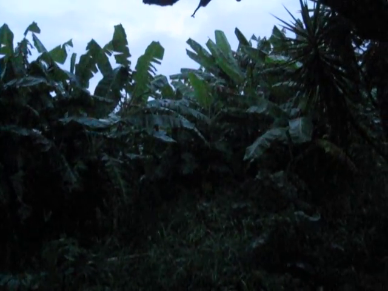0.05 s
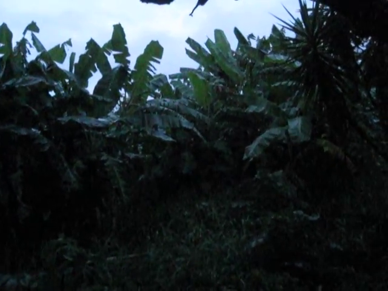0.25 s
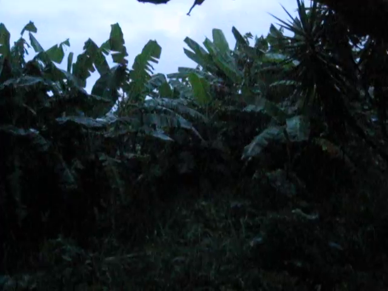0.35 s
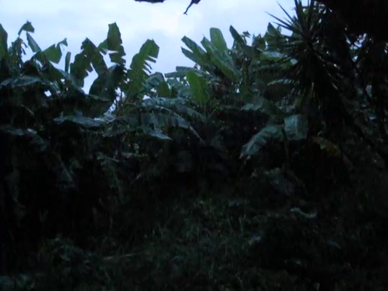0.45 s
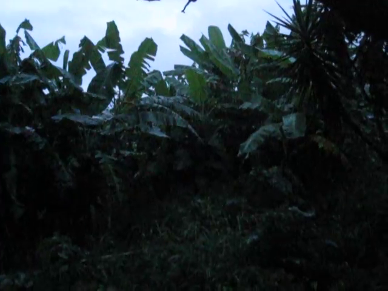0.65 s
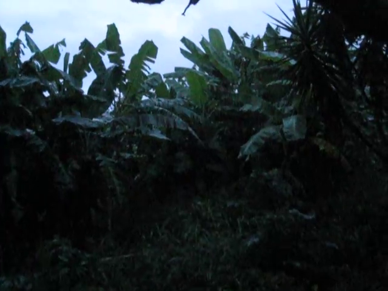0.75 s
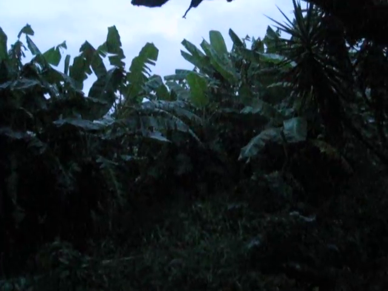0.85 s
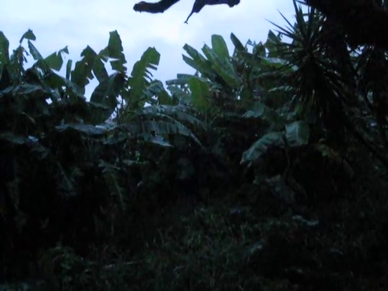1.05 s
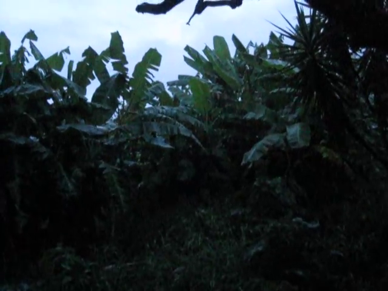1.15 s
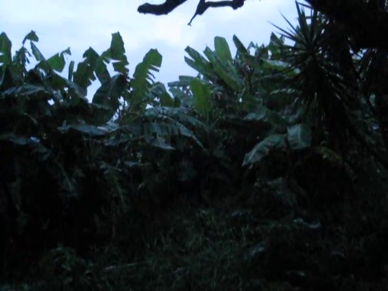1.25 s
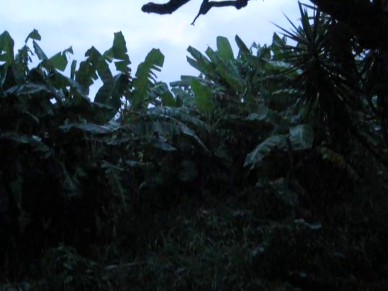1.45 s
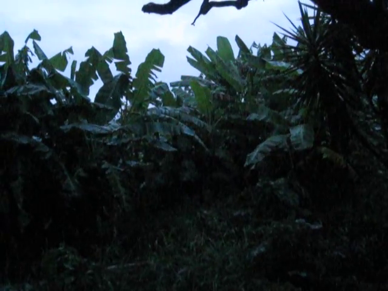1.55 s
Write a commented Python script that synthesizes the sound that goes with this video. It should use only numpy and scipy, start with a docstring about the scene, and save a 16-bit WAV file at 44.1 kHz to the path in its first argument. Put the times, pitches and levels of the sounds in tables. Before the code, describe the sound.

A frog calls once in a banana grove. From about 0.2 to 0.6 seconds, two overlapping whines glide down roughly an octave, with two short buzzy chucks near 0.5 and 0.6 seconds and a slight echo. Distant insects shrill quietly throughout over a faint rumble. Nearer insects buzz at the start and from 0.9 to 1.5 seconds. One light tick, like a drip on a leaf, lands around 1.1 seconds.

```python
"""Frog call at dusk

In a banana grove, two overlapping frog whines glide down about an octave. Then come two buzzy chucks,
made by pulses ringing the throat, and the call echoes off the plants. A far insect chorus shrills
throughout, and two nearer insects buzz their wings in spells. Something ticks once, like a drip on
a leaf, over a faint rumble."""
import sys
import numpy as np
from scipy import signal
from scipy.fft import rfft, irfft
from scipy.io import wavfile

SR = 44100
rng = np.random.default_rng(int(sys.argv[2]) if len(sys.argv) > 2 else 0)


def digitize_waveform(pressure):
    """Quantize a signal to 16-bit integers and store it at the path in sys.argv[1].

    Rows of a 2-D input are taken as channels; values are limited to [-1, 1].
    """
    field = np.atleast_2d(pressure).T
    bounded = np.clip(field, -1, 1)
    quanta = np.round(bounded * 32767).astype(np.int16)
    wavfile.write(sys.argv[1], SR, quanta)


N = 70560
T = np.arange(N) / SR


def from_db(db):
    """Turn decibels into a number to multiply by."""
    return 10 ** (np.asarray(db) / 20)


def unit_level(x):
    """Scale a sound so its average strength (rms) is 1."""
    return x / np.sqrt(np.mean(x ** 2) + 1e-20)


def over_time(rows):
    """Join a table's points in time with straight lines, one curve per column."""
    time_s, *columns = np.transpose(rows)
    return [np.interp(T, time_s, column) for column in columns]


def db_at_pitch(points, hz):
    """Read a level between a table's pitches, with octaves evenly spaced."""
    pitch_hz, level_db = np.transpose(points)
    return np.interp(np.log(np.maximum(hz, 1)), np.log(pitch_hz), level_db)


def drift(rate_hz):
    """A random wobble of size 1, mostly slower than rate_hz."""
    hz = np.fft.rfftfreq(N, 1 / SR)
    return unit_level(irfft(rfft(rng.standard_normal(N)) / (1 + (hz / rate_hz) ** 2), N))


def noise(colour):
    """Steady noise of strength 1, with lows and highs balanced by a table."""
    gain = from_db(db_at_pitch(colour, np.fft.rfftfreq(N, 1 / SR)))
    return unit_level(irfft(rfft(rng.standard_normal(N)) * gain, N))


def pulses(hz):
    """One click per cycle, shared between two neighbouring samples."""
    cycles = np.cumsum(hz) / SR
    i = np.flatnonzero(np.diff(np.floor(cycles)) > 0)
    early_share = (cycles[i + 1] % 1) * SR / hz[i]
    out = np.zeros(N)
    out[i], out[i + 1] = early_share, 1 - early_share
    return out


def resonate(x, resonances):
    """Make a sound ring at several pitches, flipping every second ring upside down."""
    out = 0
    for k, (hz, width_hz, db) in enumerate(resonances):
        decay = np.exp(-np.pi * width_hz / SR)
        feed = np.array([1, 0, -1]) * (1 - decay ** 2) / 2
        feedback = [1, -2 * decay * np.cos(2 * np.pi * hz / SR), decay ** 2]
        out = out + (-1) ** k * from_db(db) * signal.lfilter(feed, feedback, x)
    return out


def band(x, low_hz, high_hz, order=2):
    """Keep the sound between two pitches; a higher order cuts more sharply."""
    return signal.sosfilt(signal.butter(order, [low_hz, high_hz], "band", fs=SR, output="sos"), x)


# the balance of lows and highs in the air: pitch_hz, relative_db
AIR_COLOUR = [(15, -1), (35, 0), (55, -2.5), (85, 2.5), (130, -3), (200, -9.5), (350, -14), (700, -16.5),
              (1400, -19), (2800, -24.5), (4300, -25.5), (5500, -24), (7500, -33), (11000, -37.5),
              (16000, -43.5)]
def evening_air(level_db=-48.5, sway_db=1.24):
    """A faint rumble and hiss that sways gently in loudness."""
    return from_db(level_db + sway_db * drift(7.6)) * noise(AIR_COLOUR)


# the chorus's shrill tone: pitch_hz, relative_db
CHORUS_COLOUR = [(5300, -23), (5800, -17.5), (6020, -5.5), (6330, 0.5), (6530, -3), (6700, -13),
                 (7000, -34), (7400, -38)]
# its rise and fall: time_s, level_db
CHORUS_LOUDNESS = [(0, -49), (.16, -48), (.27, -50.5), (.4, -57), (.55, -51.5), (.8, -49.5), (1, -49.5),
                   (1.12, -54), (1.24, -47), (1.44, -49), (1.52, -49.5), (1.6, -58)]
def insect_chorus(pulse_hz=96.3, pulse_depth=0.12):
    """Many far insects blur into one shrill, pulsing hiss."""
    level_db, = over_time(CHORUS_LOUDNESS)
    phase = 2 * np.pi * np.cumsum(pulse_hz * (1 + 0.022 * drift(9.1))) / SR
    return from_db(level_db) * (1 + pulse_depth * np.sin(phase)) * noise(CHORUS_COLOUR)


def chirping_insect(pitch_hz=6910, width_hz=65, level_db=-61.5, peak_s=0.26, every_s=0.258):
    """One far insect's wing rings in even chirps, pitched above the chorus."""
    wing = [(pitch_hz, width_hz, 0)]
    shrill = unit_level(resonate(resonate(rng.standard_normal(N), wing), wing))
    swells = np.cos(np.pi * (T - peak_s) / every_s) ** 2
    return from_db(level_db) * swells * shrill


# single insect rasps: peak_s, level_db
RASPS = [(.225, -70), (.97, -73), (1.56, -72)]
def rasping_insect(swell_s=0.039, low_hz=13000, high_hz=15800):
    """An insect gives short, faint, very high rasps."""
    swells = sum(from_db(db) * np.exp(-((T - peak_s) / swell_s) ** 2) for peak_s, db in RASPS)
    return swells * unit_level(band(rng.standard_normal(N), low_hz, high_hz, order=3))


def wing_buzz(spells, wings, stroke_hz, swell_s, fade_s, wobble=0.0013, octave_db=-25):
    """Fast, even strokes ring the wings, with a faint octave above; each spell swells and fades."""
    low_hz, high_hz = wings[0][0] * .95, wings[-1][0] * 1.04
    out = 0
    for start_s, end_s, db in spells:
        strokes = pulses(stroke_hz * (1 + wobble * drift(60)))
        buzz = unit_level(band(resonate(strokes, wings), low_hz, high_hz))
        octave = unit_level(band(buzz ** 2, 2 * low_hz, 2 * high_hz))  # squaring doubles the pitch
        outside_spell = np.maximum(np.maximum((start_s - T) / swell_s, (T - end_s) / fade_s), 0)
        out = out + from_db(db) * np.exp(-outside_spell ** 1.24) * (buzz + from_db(octave_db) * octave)
    return out


# when the lower and the higher insect buzz: start_s, end_s, level_db
LOW_BUZZES = [(-.08, .17, -55.5), (.94, 1.21, -53.5)]
HIGH_BUZZES = [(1.12, 1.45, -49.5)]
# where their wings ring: pitch_hz, width_hz, relative_db
LOW_WING_RINGS = [(3920, 90, -8), (4080, 150, 0), (4250, 110, -8), (4550, 70, -6)]
HIGH_WING_RINGS = [(5846, 41, 8.5), (6115, 49, -2), (6370, 200, -7)]
def near_insects():
    """Two nearby insects buzz their wings, each at its own speed and pitch."""
    low = wing_buzz(LOW_BUZZES, LOW_WING_RINGS, stroke_hz=162.6, swell_s=0.035, fade_s=0.05)
    high = wing_buzz(HIGH_BUZZES, HIGH_WING_RINGS, stroke_hz=101.93, swell_s=0.12, fade_s=0.02)
    return low + high


# echoes off the plants: delay_s, relative_db
PLANT_ECHOES = [(.0085, -13), (.0156, -13.5), (.036, -17.5), (.064, -20)]
def grove_echoes(x, tail_db=-7, build_s=0.0037, fade_s=0.35):
    """Plants return a few clear echoes; leaves add a blurred tail that falls 60 dB in fade_s."""
    echoes = sum(from_db(db) * np.interp(T - delay_s, T, x, left=0) for delay_s, db in PLANT_ECHOES)
    tail = rng.standard_normal(N) * from_db(-60 * T / fade_s) * (1 - np.exp(-T / build_s))
    return echoes + from_db(tail_db) * signal.fftconvolve(x, tail / np.linalg.norm(tail))[:N]


# the tones in the tick: pitch_hz, relative_db, fade_s (time to fall 60 dB)
TICK_TONES = [(1050, -8, 0.021), (1450, -10, 0.014), (2250, -9.5, 0.021), (3170, -8.5, .013),
              (4150, 0.5, 0.013), (5000, -6.5, .011), (5700, -14, 0.01), (6930, -6.5, 0.0099),
              (11100, -18, 0.0098)]
def tick(start_s=1.1353, ring_db=-28.5, spray_db=-54.5, spray_fade_s=0.1):
    """One light hit rings briefly and leaves a short spray, like a drip on a leaf."""
    age_s = np.maximum(T - start_s, 0)
    ring = 0
    for k, (hz, db, fade_s) in enumerate(TICK_TONES):
        ring += (-1) ** k * from_db(ring_db + db - 60 * age_s / fade_s) * np.sin(2 * np.pi * hz * age_s)
    spray = unit_level(band(rng.standard_normal(N), 1000, 10000))
    return ring + (age_s > 0) * from_db(spray_db - 60 * age_s / spray_fade_s) * spray


# the frog's chucks: start_s, length_s, level_db, pulse_hz, upper_rings_db
CHUCK_NOTES = [(.494, 0.035, -36, 213.3, -1), (.566, 0.029, -35, 216.8, 2.5)]
# where its throat and vocal sac ring: pitch_hz, width_hz, relative_db
LOWER_RINGS = [(434, 100, -15), (1066, 46, -4), (1226, 147, 0.5)]
UPPER_RINGS = [(2054, 110, -4.5), (2334, 140, 1), (2590, 170, 0.5), (2750, 175, 0), (2907, 184, 5),
               (3210, 270, -8)]
def frog_chucks(rise_s=0.0022, fade_s=0.016, slowing_hz_per_s=154.4, wobble=0.01402):
    """Short runs of sharp pulses ring the throat, slowing a little as they go."""
    out = 0
    for start_s, length_s, db, pulse_hz, upper_db in CHUCK_NOTES:
        age_s = np.clip(T - start_s, 0, 2 * length_s)
        clicks = pulses((pulse_hz - slowing_hz_per_s * age_s) * (1 + wobble * drift(147)))
        voice = resonate(clicks, LOWER_RINGS) + from_db(upper_db) * resonate(clicks, UPPER_RINGS)
        rise = np.clip(age_s / rise_s, 0, 1)
        fade = np.exp(-np.maximum(T - start_s - length_s, 0) / fade_s)
        out = out + from_db(db) * rise * fade * unit_level(band(voice, 324, 3480, order=7))
    return out


# how strong a whine's overtones are at each pitch: pitch_hz, relative_db
OVERTONE_COLOUR = [(900, -10), (1300, 0.5), (1600, -4), (1900, -6.5), (2500, -0.5), (3100, -7),
                   (3600, -15.5), (4400, -39), (6000, -48)]
def whine(glide, loudness, wobble=0.0112, flutter_db=3.5):
    """A gliding base tone with fluttering overtones at 2 to 8 times its pitch."""
    hz, = over_time(glide)
    tone_db, overtones_db = over_time(loudness)
    phase = 2 * np.pi * np.cumsum(hz * (1 + wobble * drift(210))) / SR
    voice = from_db(tone_db) * np.sin(phase)
    for k in range(2, 9):
        db = overtones_db + db_at_pitch(OVERTONE_COLOUR, k * hz) + flutter_db * drift(110)
        voice += from_db(db) * np.sin(k * phase)
    calling = (T > loudness[0][0]) * (T < loudness[-1][0])
    return np.sqrt(2) * voice * calling


# how the leading and the main whine fall: time_s, pitch_hz
LEAD_GLIDE = [(.228, 1106), (.238, 986.5), (.25, 855), (.27, 756.6), (.31, 647.3), (.36, 560.2), (.43, 487),
              (.51, 431)]
MAIN_GLIDE = [(.24, 1128), (.258, 1060), (.27, 891.3), (.286, 827), (.31, 771.9), (.335, 682.5),
              (.365, 600.9), (.395, 556.1), (.43, 525), (.47, 502), (.53, 470.1), (.6, 416)]
# how loud they are: time_s, tone_db, overtones_db
LEAD_LOUDNESS = [(.226, -58, -79), (.232, -27, -47), (0.239, -43, -57), (.251, -25.5, -45),
                 (.264, -30.5, -46.5), (.28, -37.5, -48), (0.309, -38.5, -49.5), (.37, -50, -60.5),
                 (.49, -53, -77), (.525, -63, -80)]
MAIN_LOUDNESS = [(.238, -47, -68), (0.249, -37, -53), (.272, -30.5, -44), (.286, -29.5, -41.5),
                 (.335, -31.5, -44.5), (.37, -40, -47.5), (0.409, -35.5, -51), (0.436, -51, -49.5),
                 (.448, -31.5, -50), (.488, -43, -52), (.505, -52, -49.5), (.545, -46.5, -54),
                 (0.591, -50.5, -48.5), (.615, -64, -75)]
def frog_whines():
    """Two falling whines overlap, the main one a moment behind."""
    return whine(LEAD_GLIDE, LEAD_LOUDNESS) + whine(MAIN_GLIDE, MAIN_LOUDNESS)


def scene():
    """Air, insects, tick and frog call, the same in both ears."""
    call = frog_whines() + frog_chucks()
    tap = tick()
    insects = chirping_insect() + insect_chorus() + rasping_insect() + near_insects()
    air = evening_air()
    echoes = grove_echoes(call + from_db(-10) * tap)
    mix = air + insects + echoes + tap + call
    return np.array([mix, mix])


def record(dry, cutoff_hz=15800):
    """Cut away the very highest treble sharply."""
    return signal.sosfilt(signal.ellip(12, .1, 80, cutoff_hz, fs=SR, output="sos"), dry)


dry = scene()
out = record(dry)
digitize_waveform(out)
```